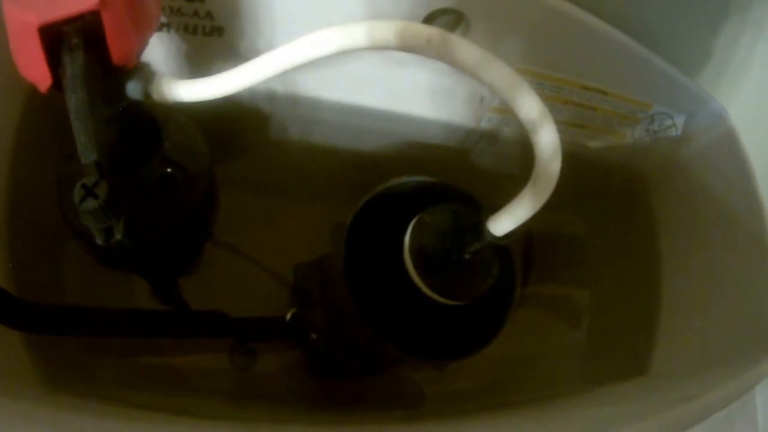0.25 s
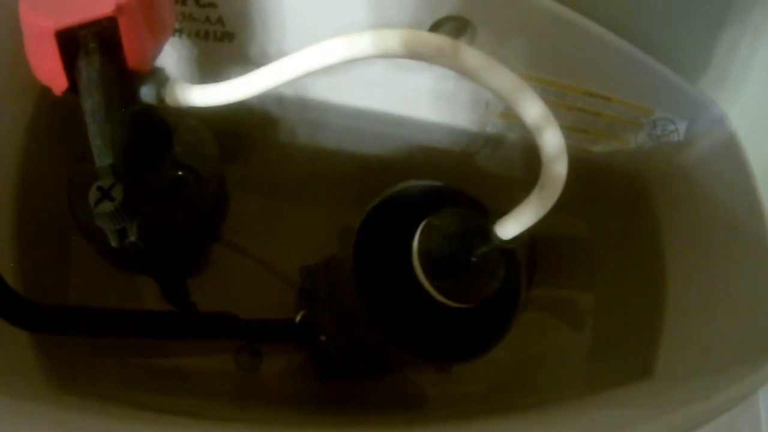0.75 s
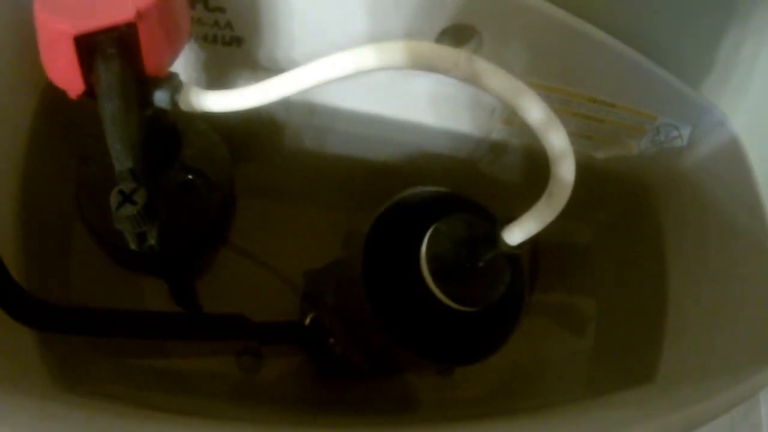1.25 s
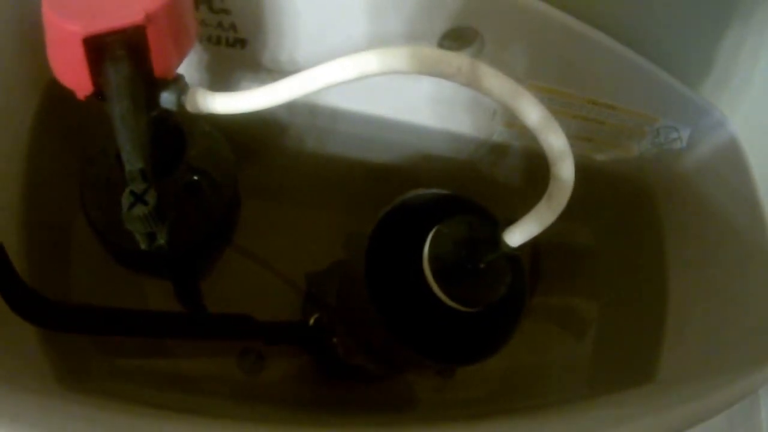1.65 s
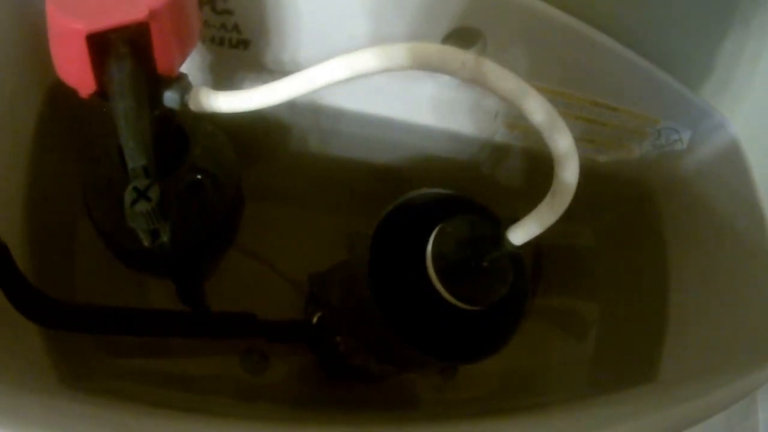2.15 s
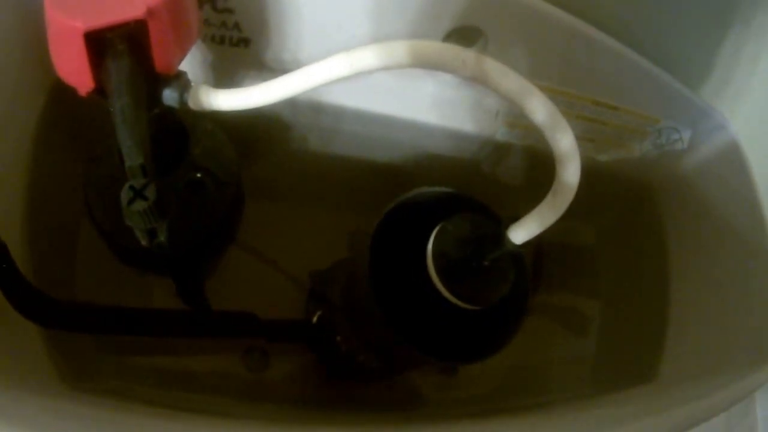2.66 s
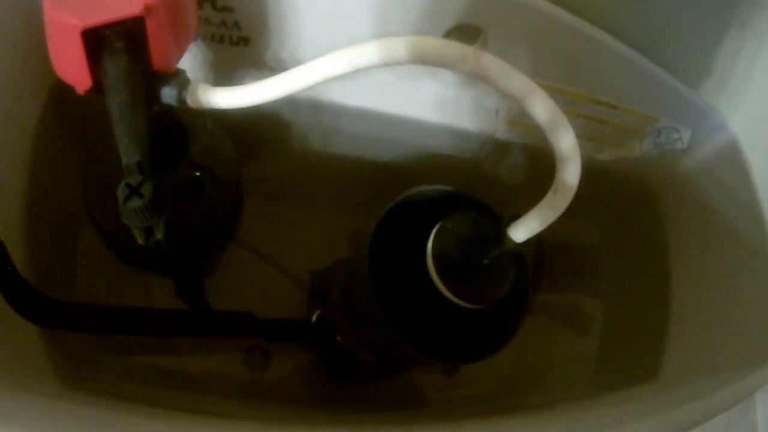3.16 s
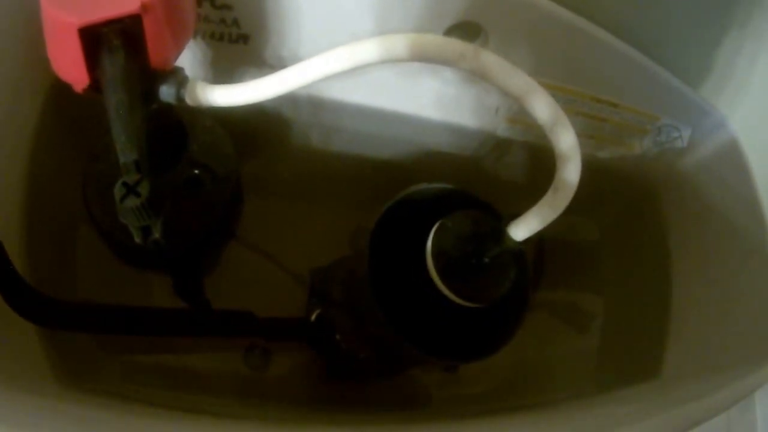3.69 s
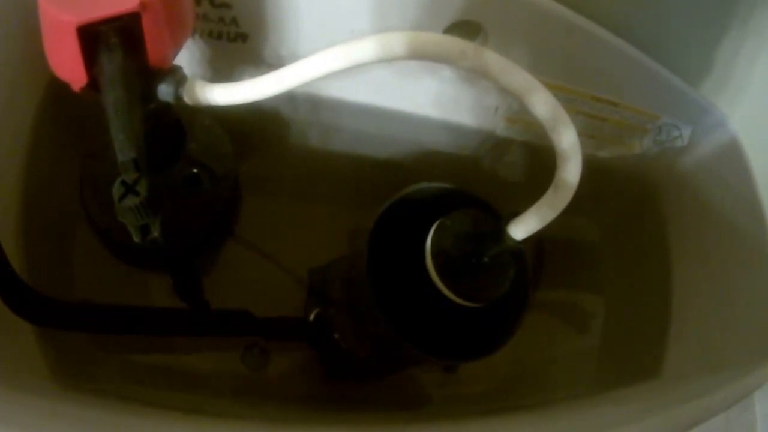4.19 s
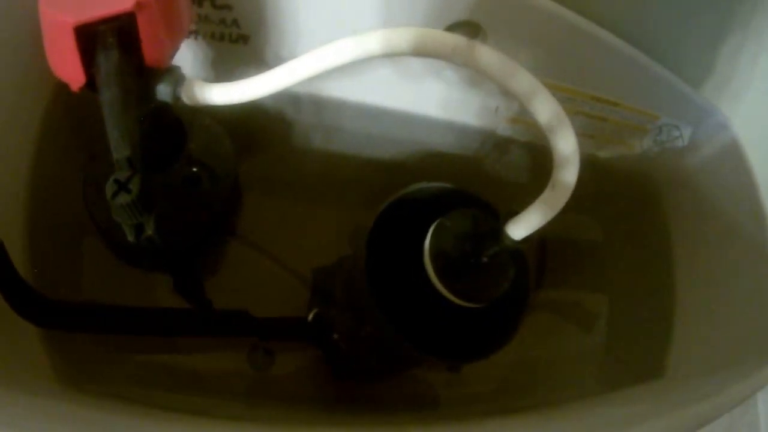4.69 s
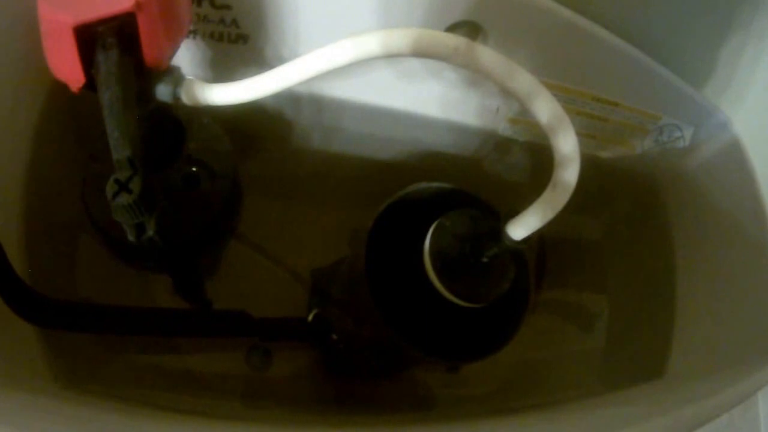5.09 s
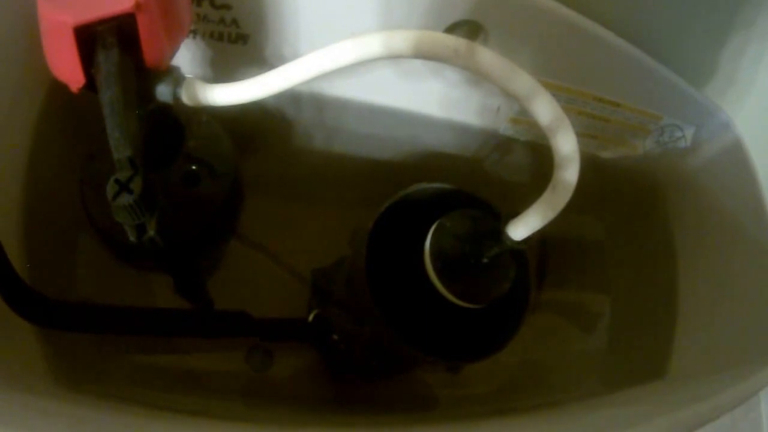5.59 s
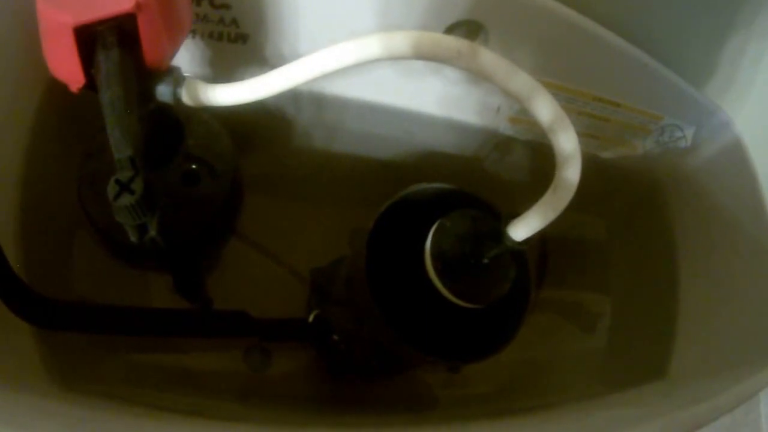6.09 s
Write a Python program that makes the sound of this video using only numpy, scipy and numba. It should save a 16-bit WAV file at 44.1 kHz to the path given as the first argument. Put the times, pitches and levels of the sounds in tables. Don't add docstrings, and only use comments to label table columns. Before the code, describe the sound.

A steady refill of a toilet cistern: narrow jet hiss, dense fizzing froth and fine spray crackle, all coloured by a ringing pipe and porcelain walls. Random bright bubble ticks, light drips and short rising whistle-like blips stand out throughout, with a few barely noticeable low gulps. It never stops or starts, only swells gently late on. A small stereo microphone hangs just above the water in a quiet bathroom.

```python
import sys
import numpy as np
from scipy import signal
from scipy.fft import rfft, irfft
from scipy.io import wavfile
from numba import njit

SR = 44100
rng = np.random.default_rng(int(sys.argv[2]) if len(sys.argv) > 2 else 0)


def unload_wav(signal):
    wavfile.write(
        sys.argv[1],
        SR,
        np.round(np.clip(np.atleast_2d(signal).T, -1, 1) * 32767).astype(np.int16),
    )


def magnitude_from_level(level_db):
    exponent = np.asarray(level_db, float) / 20
    return 10 ** exponent


N = 279594

# f/Hz, width/Hz, level/dB per Hz
RESONANCES = [(209, 10.5, -17), (262, 20, -22.5), (514.4, 26, -16.5), (546.5, 15, -16.5), (649, 37, -14.5),
              (990, 12, -22), (1012.5, 46, -11), (1021.2, 13.5, -2.5), (1360, 73.5, -9.5), (1528, 25, -11),
              (1620, 35, -7), (1724, 75, -8), (1903, 95, -16), (2135, 22, -25), (2426, 11.3, -17.5),
              (2500, 21, -20.5), (3377, 58, -24.5), (3560, 100, -31), (4220, 152, -16.5),
              (4460, 102, -14.5), (4840, 79, -25.5), (5203, 300, -24.5), (5630, 380, -32.5),
              (6300, 185, -29.5), (6680, 103, -29), (7200, 91, -33), (7754, 370, -29.5), (8060, 110, -28.5),
              (8840, 220, -29.5), (9500, 170, -28)]
# f/Hz, level/dB per Hz
LEAK = [(25, -26.5), (110, -33.5), (165, -31), (200, -20.5), (420, -23.5), (800, -26.5), (1200, -26),
        (2300, -28), (3100, -32.5), (5500, -50.5), (7000, -43.5), (10200, -42), (11100, -34.5),
        (11600, -40.5), (12400, -39.5)]
# delay/ms, feedback/1
WALL_ECHOES = [(2.3, 0.77), (3.9, 0.95), (6.7, 0.95)]
# t/s, froth level/dB
FROTH = [
    (0.0, 4),
    (0.81, 5.5),
    (1.24, 4),
    (3.42, 4),
    (4.2, 7.5),
    (4.8, 6),
    (5.42, 5.5),
    (6.34, 3.5),
]
# f/Hz, level/dB per Hz
ROOM_SPECTRUM = [(30, -26), (120, -14), (250, -4), (600, 2.5), (1100, -16), (2000, -15.5), (3000, -5),
                 (5000, -11), (9000, -8), (12400, -2.5)]
# t/s, peak level/dB, f/Hz
MIDDLE_BUBBLES = [(0.0877, -37, 1700), (0.513, -31.5, 1620), (1.4366, -40, 1710), (2.169, -37, 1380),
                  (2.4857, -31, 1515), (2.9445, -35, 1630), (3.259, -34, 1640), (3.822, -37, 1680),
                  (4.0116, -25.5, 1620), (4.808, -41, 1560), (4.9582, -35, 1360), (5.021, -35, 1640),
                  (5.0832, -32.5, 1580), (6.0768, -33, 1770), (6.1923, -36.5, 1290)]
# t/s, peak level/dB, f/Hz
LOW_DRIPS = [(0.1067, -40.5, 2410), (0.9278, -44, 2380), (1.018, -36.5, 2500), (1.0934, -46, 2500),
             (1.5459, -45, 2400), (3.0295, -46, 2420), (3.2201, -44, 2500), (3.4131, -47, 2370),
             (3.4585, -42, 2500), (3.6077, -49, 2410), (4.4686, -44, 2400), (4.6848, -40.5, 2370),
             (4.7573, -42, 2410), (4.8918, -42, 2380), (5.4798, -42, 2500), (5.8825, -39, 2400),
             (6.0345, -44, 2420), (6.2063, -46, 2500)]
# t/s, peak level/dB
HIGH_DRIPS = [(0.4663, -47), (2.3201, -45), (2.356, -45), (2.515, -49), (3.373, -48), (3.7095, -50),
              (3.812, -47), (3.9335, -47), (4.1555, -44.5), (4.448, -41), (4.6867, -44), (5.27, -44),
              (5.5124, -47), (5.8571, -47)]
# t/s, peak level/dB, f/Hz
SPRAY_SPECKS = [(0.13, -37, 6210), (0.7013, -39, 7830), (0.8131, -38, 6600), (0.8829, -40, 6400),
                (1.147, -41, 6300), (1.6691, -40, 6040), (1.832, -41, 9500), (1.8741, -43, 9580),
                (1.9395, -40, 6680), (2.129, -39.5, 9540), (2.1944, -40, 6150), (2.2363, -40, 8650),
                (2.5036, -46, 6000), (2.522, -38, 8050), (2.76, -39.5, 9500), (3.264, -36, 8600),
                (3.4475, -37, 9900), (3.63, -39, 6350), (4.0806, -40, 8260), (4.374, -42, 8260),
                (4.4732, -40, 6340), (4.591, -38.5, 8000), (4.776, -40, 6150), (5.032, -36, 9250),
                (5.0835, -38, 9580), (5.1008, -36.5, 7650), (5.209, -40, 9100), (5.396, -38, 9400),
                (5.6406, -39, 7800), (6.0706, -38, 8060)]
# t/s, peak level/dB, f/Hz
TICKS = [(0.1528, -27.5, 4460), (0.219, -34.5, 4400), (0.3145, -31.5, 4460), (0.421, -32, 4320),
         (0.7485, -35, 4460), (0.8126, -24.5, 4300), (4.574, -34, 4470), (1.1475, -33, 4500),
         (1.1718, -33, 4270), (1.5507, -33, 4230), (1.689, -32, 4530), (1.708, -29.5, 4240),
         (1.7644, -34, 4460), (1.7996, -28, 4460), (1.9186, -33, 4440), (2.0958, -32, 4500),
         (2.195, -33.5, 4530), (2.5038, -23, 4460), (3.097, -32, 4450), (3.2346, -33.5, 4400),
         (3.5583, -24, 4500), (3.6346, -32, 4570), (3.711, -34.5, 4160), (3.9652, -35.5, 4460),
         (4.3732, -32.5, 4550), (4.5555, -29.5, 4300), (4.592, -28, 4400), (4.7095, -33.5, 4400),
         (5.1554, -34, 4370), (5.7346, -37, 4500)]
# t/s, peak level/dB, f/Hz, decay/cycles
WHISTLE_BUBBLES = [(0.258, -39, 1018, 23), (0.805, -36.5, 952, 30), (1.0095, -29, 1020, 21),
                   (1.059, -34, 1024, 42), (1.214, -26, 1022, 30), (1.252, -43, 1018, 40),
                   (1.55, -41, 1053, 32), (2.071, -29, 1034, 22), (2.732, -46, 990, 23),
                   (2.897, -32.5, 1010, 17), (3.099, -43, 1000, 32), (3.324, -27.5, 1007, 34),
                   (3.533, -42, 957, 27), (3.651, -42.5, 1010, 29), (3.735, -36.5, 1050, 28),
                   (3.821, -44, 1000, 50), (3.851, -41, 1060, 36), (3.889, -26, 1023, 30),
                   (3.978, -45, 1000, 26), (4.108, -42, 970, 36), (4.395, -24, 1013, 35),
                   (4.502, -44, 1040, 35), (4.768, -37, 1010, 20), (4.932, -31, 1040, 32),
                   (5.084, -40, 1057, 32), (5.287, -42, 1070, 35), (5.379, -41.5, 1005, 37),
                   (5.745, -49, 1030, 33), (5.976, -39, 1045, 30), (6.192, -45.5, 1020, 35)]
# t/s, peak level/dB
GULPS = [
    (0.801, -48),
    (2.731, -47),
    (3.113, -45.5),
    (3.529, -43.5),
    (3.888, -41.5),
]

JET_DB, JET_LOSS_PER_FROTH_DB = -46.5, 0.21
SMEAR_ABOVE_HZ = 3650
GULP_HZ, HIGH_DRIP_HZ = 650, 3370
SIDE_DB = -65
WHINE_HZ, WHINE_DB = 11988, -84
CUTOFF_HZ = 12400


def in_time(rows):
    t_s, *columns = np.transpose(rows)
    return [np.interp(np.arange(N) / SR, t_s, column) for column in columns]


def at_hz(points, hz):
    point_hz, point_db = np.array(points).T
    return np.interp(np.log(hz + 1), np.log(point_hz), point_db)


def rms_one(x):
    return x / np.sqrt(np.mean(x ** 2))


def drift(rate_hz):
    pole = np.exp(-80 * np.pi * rate_hz / SR)
    white = rng.standard_normal(N // 40 + 2002)
    slow = signal.lfilter([1], [1, -2 * pole, pole * pole], white)[2000:]
    return np.interp(np.arange(N) / 40, np.arange(len(slow)), rms_one(slow))


def causal(power):
    cepstrum = irfft(np.log(power) / 2)
    cepstrum[1:len(power) - 1] *= 2
    cepstrum[len(power):] = 0
    return irfft(np.exp(rfft(cepstrum)))[:8192]


def pipe_response():
    hz = np.linspace(0, SR / 2, 16385)
    power = magnitude_from_level(at_hz(LEAK, hz)) ** 2
    for centre_hz, width_hz, db in RESONANCES:
        detune = (2 * (hz - centre_hz) / width_hz) ** 2
        power = power + magnitude_from_level(db) ** 2 / (1 + detune) / (1 + detune / 60)
    return causal(power)


def tank_echo(response):
    low_pass = signal.butter(8, SMEAR_ABOVE_HZ, "low", fs=SR, output="sos")
    high_pass = signal.butter(8, SMEAR_ABOVE_HZ, "high", fs=SR, output="sos")
    low = signal.sosfilt(low_pass, response)
    high = signal.sosfilt(high_pass, response)
    for delay_ms, feedback in WALL_ECHOES:
        loop = np.zeros(int(delay_ms * SR / 1000) + 1)
        loop[0], loop[-1] = 1, -min(feedback, .95)
        high = signal.lfilter(-loop[::-1], loop, high)
    return low + high


@njit
def add_bubbles(out, at, hz, glide, cycles, size, swell_cycles, sr):
    for k in range(len(at)):
        phase, step = 0., hz[k] / sr
        for i in range(min(int(cycles[k] / step), len(out) - at[k])):
            turns = i * step
            phase += 2 * np.pi * min(step * (1 + glide[k] * turns), .45)
            swell = (1 - np.exp(-turns / swell_cycles)) ** 2
            decay = np.exp(-6.9 * turns / cycles[k])
            out[at[k] + i] += size[k] * swell * decay * np.sin(phase)


def fizz(count, low_hz, high_hz, spread_db, cycles, clump, clumps_per_s):
    draw = rng.random((count, 4))
    density = np.cumsum(np.exp(clump * drift(clumps_per_s)))
    at = np.searchsorted(density, draw[:, 0] * density[-1])
    hz = low_hz + (high_hz - low_hz) * draw[:, 1] ** 1.6
    burst_db = spread_db * np.minimum(-np.log(draw[:, 2]), 2.5)
    size = (hz / 1000) ** 1.048 * magnitude_from_level(burst_db)
    out = np.zeros(N)
    add_bubbles(out, at, hz, 0.0285 * draw[:, 3], cycles * (.5 + draw[:, 3]), size, 1.1, SR)
    return rms_one(out)


def trickle(response):
    froth_db, = in_time(FROTH)
    jet_db = JET_DB - JET_LOSS_PER_FROTH_DB * froth_db
    hiss = rng.standard_normal(N) * magnitude_from_level(0.46 * drift(4.5) - 1)
    froth = magnitude_from_level(froth_db - 8.0) * fizz(count=12000, low_hz=456.0, high_hz=12830, spread_db=3.5,
                                       cycles=35.0, clump=.5, clumps_per_s=14)
    spray = magnitude_from_level(-2.0) * fizz(count=1800, low_hz=5510, high_hz=10900, spread_db=5.5,
                             cycles=17, clump=.9, clumps_per_s=45)
    gain = magnitude_from_level(jet_db + 3.5) / np.sqrt(np.sum(response ** 2))
    return signal.fftconvolve(gain * (hiss + froth + spray), response)[:N]


def room_side():
    hz = np.linspace(0, SR / 2, 8193)
    shape = causal(magnitude_from_level(at_hz(ROOM_SPECTRUM, hz)) ** 2)
    hiss = signal.fftconvolve(rng.standard_normal(N), shape)[:N]
    return magnitude_from_level(SIDE_DB) * rms_one(hiss)


def audible(rows, response, below, swell_cycles, lead_s, glide, cycles, glide_per_db=0.0):
    out = np.zeros(N + 20000)
    for t_s, db, hz, *own_cycles in rows:
        one = np.zeros(3000)
        climb = glide * magnitude_from_level(glide_per_db * (db + 36))
        life_cycles = max(*own_cycles, cycles, 2.)
        add_bubbles(one, np.array([0]), np.array([hz * below]), np.array([climb]),
                    np.array([life_cycles]), np.ones(1), swell_cycles, SR)
        heard = signal.fftconvolve(np.trim_zeros(one, "b"), response[:6000])
        i = max(int((t_s - lead_s) * SR), 0)
        out[i:i + len(heard)] += magnitude_from_level(db) * heard / np.abs(heard).max()
    return out[:N]


def middle_bubbles(response):
    return audible(MIDDLE_BUBBLES, response, below=0.94, swell_cycles=1.1, lead_s=0.002544,
                   glide=.019, cycles=23.0)


def drips(response):
    rows = LOW_DRIPS + [(t_s, db, HIGH_DRIP_HZ) for t_s, db in HIGH_DRIPS]
    return audible(rows, response, below=1.0, swell_cycles=4.1, lead_s=0.003,
                   glide=0.00085, cycles=44.0)


def spray_specks(response):
    return audible(SPRAY_SPECKS, response, below=0.882, swell_cycles=5.2, lead_s=.0005,
                   glide=0.0212, cycles=38.0)


def ticks(response):
    return audible(TICKS, response, below=0.89, swell_cycles=1.13, lead_s=.0008,
                   glide=.025, cycles=54.0, glide_per_db=0.6)


def whistle_bubbles(response):
    return audible(WHISTLE_BUBBLES, response, below=0.93, swell_cycles=3.5, lead_s=0.004995,
                   glide=0.0078, cycles=2., glide_per_db=0.23)


def gulps(response):
    rows = [(t_s, db, GULP_HZ) for t_s, db in GULPS]
    return audible(rows, response, below=0.96, swell_cycles=3.1, lead_s=0.00426,
                   glide=0.029, cycles=14.0)


def scene():
    response = tank_echo(pipe_response())
    mid = trickle(response)
    side = room_side()
    mid += middle_bubbles(response)
    mid += drips(response)
    mid += spray_specks(response)
    mid += ticks(response)
    mid += whistle_bubbles(response)
    mid += gulps(response)
    return mid + side * [[1], [-1]]


def band_limit(x):
    return signal.sosfilt(signal.butter(12, 12920, fs=SR, output="sos"), x)


def record(dry):
    whine = magnitude_from_level(WHINE_DB) * np.sin(2 * np.pi * WHINE_HZ * np.arange(N) / SR)
    top_cut = signal.ellip(7, .5, 34, CUTOFF_HZ, fs=SR, output="sos")
    mix = signal.sosfilt(top_cut, dry + whine)
    return band_limit(mix)


dry = scene()
out = record(dry)
unload_wav(out)
```